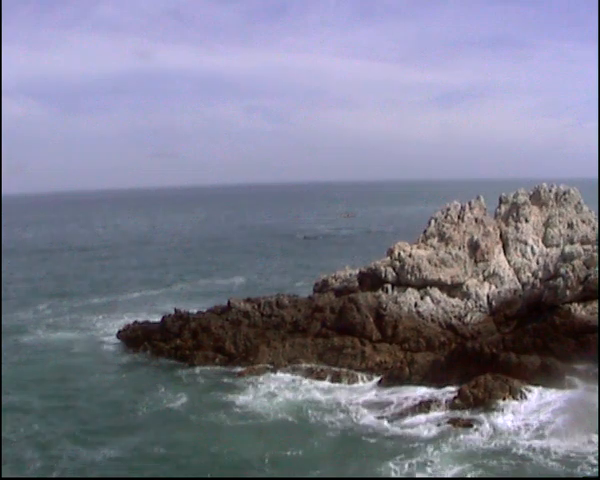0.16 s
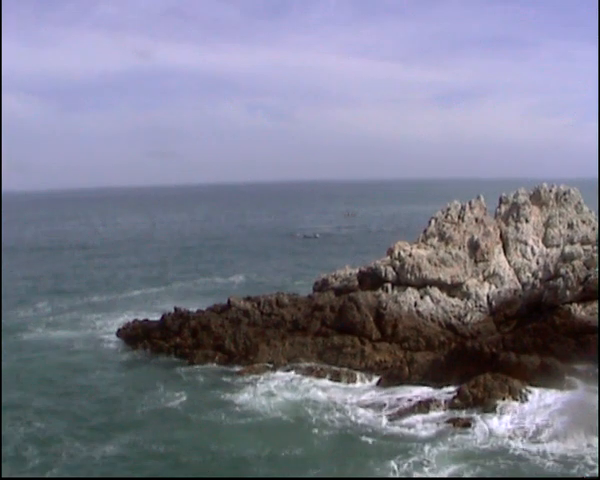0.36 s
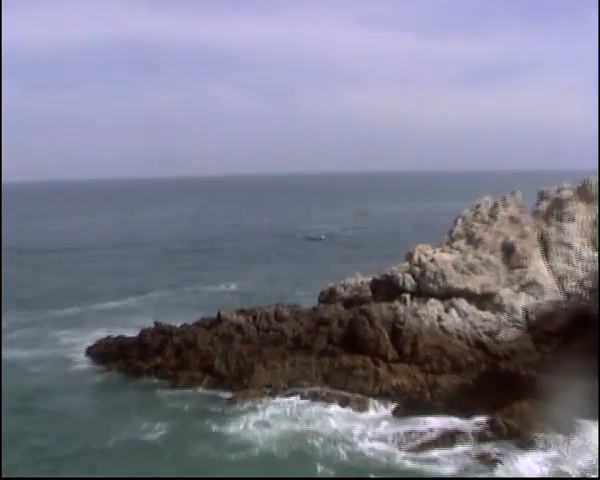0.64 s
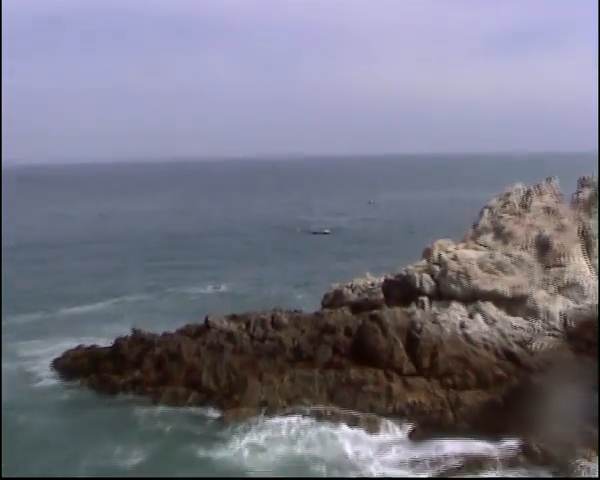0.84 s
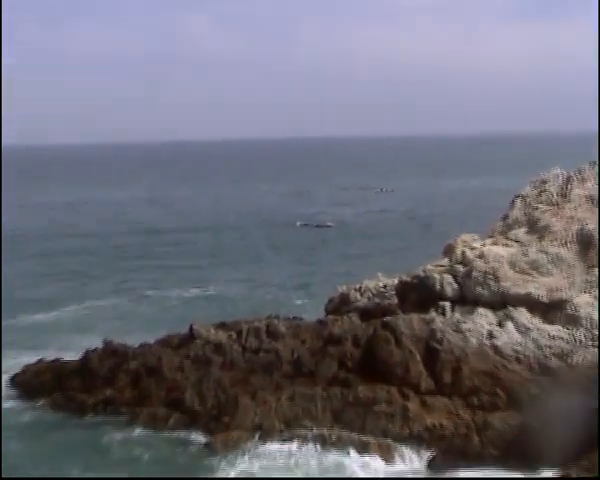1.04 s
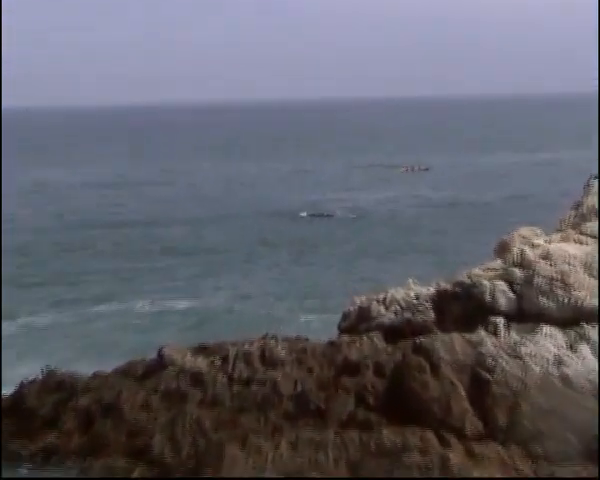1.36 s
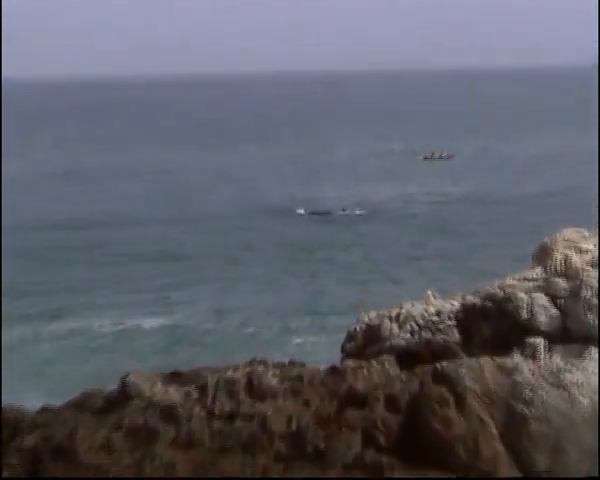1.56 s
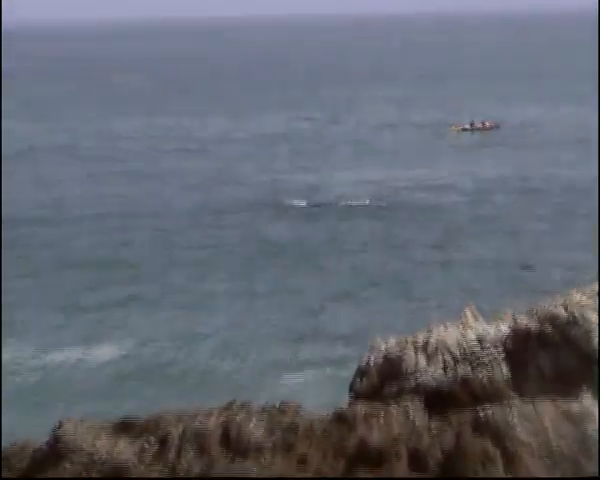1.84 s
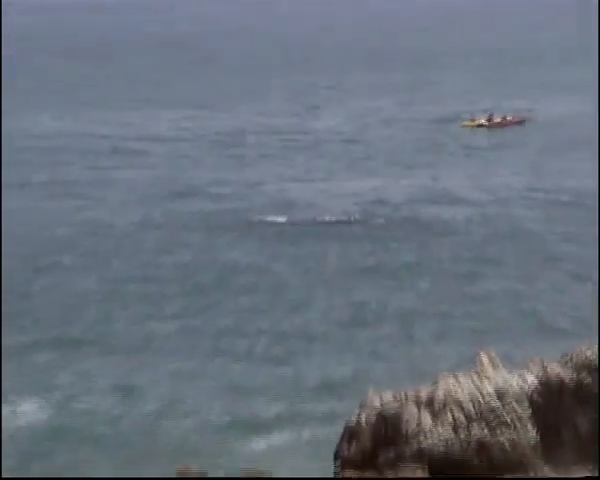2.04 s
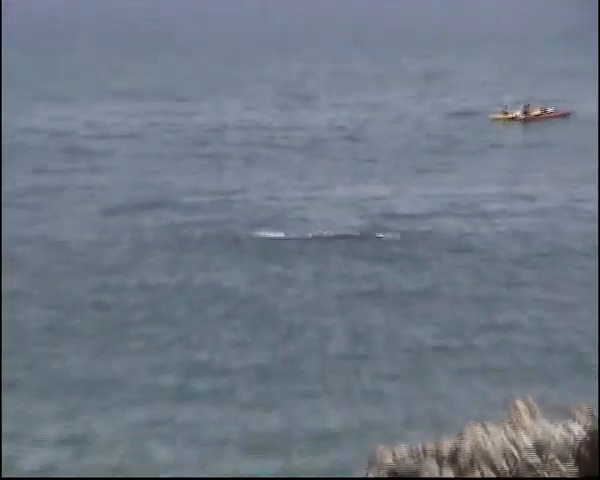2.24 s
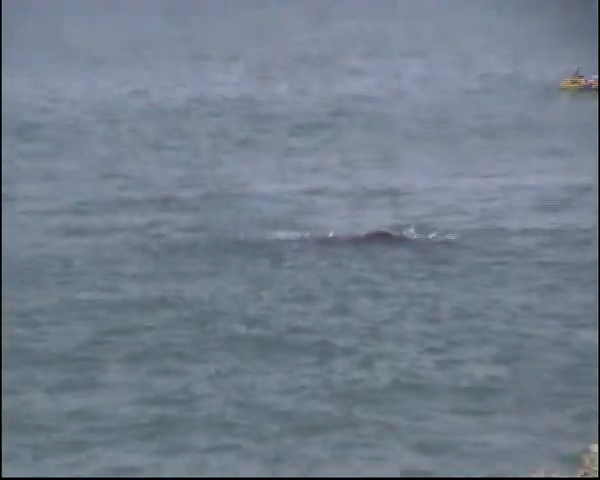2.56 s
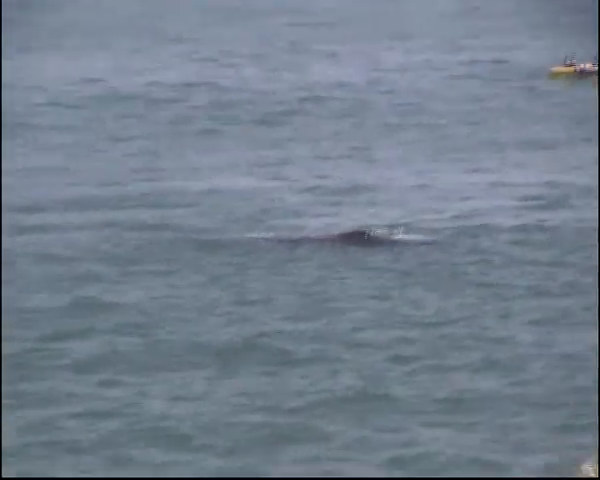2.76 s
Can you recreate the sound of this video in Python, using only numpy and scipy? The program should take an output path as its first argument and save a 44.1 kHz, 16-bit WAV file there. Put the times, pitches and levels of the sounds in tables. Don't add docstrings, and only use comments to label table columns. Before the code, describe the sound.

Surf washing steadily round coastal rocks, with low breaker rumble, bubbling foam and buffeting wind

```python
import sys
import numpy as np
from scipy import signal
from scipy.fft import rfft, irfft
from scipy.io import wavfile

SR = 44100
rng = np.random.default_rng(int(sys.argv[2]) if len(sys.argv) > 2 else 0)


def undo_db(level):
    steps = np.asarray(level, float) / 20
    return 10 ** steps


def transcribe(signal):
    frames = np.atleast_2d(signal).T
    limited = np.clip(frames, -1, 1)
    pcm = np.round(limited * 32767).astype(np.int16)
    wavfile.write(sys.argv[1], SR, pcm)


N = 127890


def rms_one(x):
    return x / np.sqrt(np.mean(x ** 2) + 1e-20)


def in_time(rows):
    return np.interp(np.arange(N) / SR, *np.transpose(rows))


def at_hz(points, hz):
    points_hz, values = np.transpose(points)
    return np.interp(np.log(hz), np.log(points_hz), values)


def drift(rate_hz):
    step, settle = 40, 2000
    pole = np.exp(-2 * np.pi * rate_hz * step / SR)
    noise = rng.standard_normal(N // step + settle + 2)
    slow = signal.lfilter([1], [1, -2 * pole, pole ** 2], noise)[settle:]
    return np.interp(np.arange(N) / step, np.arange(len(slow)), rms_one(slow))


def colour(x, peaks):
    for hz, width_hz, db in peaks:
        a = undo_db(db / 2)
        w = 2 * np.pi * hz / SR
        k = np.pi * width_hz / SR
        top = [1 + k * a, -2 * np.cos(w), 1 - k * a]
        bottom = [1 + k / a, -2 * np.cos(w), 1 - k / a]
        x = signal.lfilter(top, bottom, x)
    return x


# time in seconds, level in dB.
WASH_VIGOUR = [(0.06, -22.5), (0.08, -23.5), (0.38, -20.5), (0.4, -19.5), (0.42, -21.5), (1.76, -21.5),
               (2.88, -24), (2.9, -22.5)]
# time in seconds, level in dB.
BREAKER_THUD = [(0.06, -27), (0.07, -30.5), (0.4, -25), (0.48, -31.5), (0.57, -25.5), (0.62, -27.5),
                (1.17, -25.5), (1.19, -23), (1.59, -26.5), (1.7, -22.5), (1.85, -30), (1.88, -24.5),
                (2.88, -27.5), (2.9, -33)]
# frequency in Hz, level in dB per Hz.
FOAM_COLOUR = [(60, -4.5), (130, -3.5), (230, -5.5), (470, -11.5), (1500, -11.5), (3500, -20), (7000, -27),
               (11000, -35)]
# frequency in Hz, share from 0 to 1.
FOAM_LIKENESS = [(60, 0.87), (300, 0.98), (1100, 1), (1900, 1), (2600, 0.75), (4000, 0.6), (6000, 0.72),
                 (10000, .4)]


def foam(vigour_db, thud_db):
    foam_db, patch_db = 1.5, 0.45
    rumble_hz, rumble_follows = 298, 0.69
    wash_swing = vigour_db - vigour_db.mean()
    thud_swing = rumble_follows * (thud_db - thud_db.mean())
    edges = 45 * 2 ** (np.arange(26) / 3)
    white = rng.standard_normal((2, 2, N))
    together, neighbour = drift(8.5), drift(9.0)
    out = 0
    for k, (low, high) in enumerate(zip(edges, edges[1:])):
        band = signal.butter(2, [low, high], "band", fs=SR, output="sos")
        mid, side = signal.sosfilt(band, white[k % 2])
        hz = np.sqrt(low * high)
        own = drift(27.0)
        patches = 0.52 * together + 0.6 * neighbour + 0.6 * own
        deep = 1 / (1 + (hz / rumble_hz) ** 2)
        swing = (1 - deep) * wash_swing + deep * thud_swing
        gain = undo_db(at_hz(FOAM_COLOUR, hz) + swing + patch_db * patches)
        alike = np.clip(at_hz(FOAM_LIKENESS, hz), 0, 1)
        pair = np.sqrt(1 + alike) * mid + np.sqrt(1 - alike) * side * [[1], [-1]]
        out = out + gain * pair
        neighbour = own
    return undo_db(vigour_db.mean() + foam_db) * rms_one(out)


# resonance in Hz, width in Hz, level in dB.
COVE_HOLLOWS = [
    (61, 11, 5),
    (119, 26, 3.5),
    (202, 27, 3.5),
    (234, 34, -1.5),
]


def cove(surf):
    return colour(surf, COVE_HOLLOWS)


def bubbles(vigour_db):
    per_second, level_db = 1500, -7
    ring_cycles = 7.2
    strength = undo_db(2.27 * np.minimum(rng.exponential(1, N), 4)) * rng.choice([-1, 1], N)
    born = rng.random(N) < per_second * undo_db(3.0 * drift(7.0)) / SR
    pitches = np.geomspace(500, 5000, 24)
    dealt = rng.integers(0, len(pitches), N)
    out = 0
    for k, hz in enumerate(pitches):
        r = undo_db(-60 * hz / (ring_cycles * SR))
        w = 2 * np.pi * hz / SR
        bursts = strength * born * (dealt == k) + 1e-18
        out = out + signal.lfilter([0, np.sin(w)], [1, -2 * r * np.cos(w), r * r], bursts)
    return undo_db(vigour_db + level_db) * rms_one(out)


# time in seconds, level in dB.
PORT_GUSTS = [(0.06, -27), (0.39, -27), (0.45, -41), (0.49, -24.5), (0.63, -46), (0.65, -29), (0.87, -27),
              (0.94, -40), (1.74, -18.5), (1.93, -35), (2.08, -17.5), (2.23, -33), (2.27, -23), (2.49, -39),
              (2.61, -22.5), (2.65, -52), (2.86, -19), (2.9, -42)]


def wind():
    low_hz, high_hz = 6.7, 37
    own_share, lump_db, follows = 0.026, 0.9, 0.92
    side_db = np.array([[4], [-9]])
    band = signal.butter(2, [low_hz, high_hz], "band", fs=SR, output="sos")
    noise = rng.standard_normal((3, N + SR))
    shared, left, right = rms_one(signal.sosfilt(band, noise)[:, SR:])
    pair = np.sqrt(1 - own_share) * shared + np.sqrt(own_share) * np.array([left, right])
    gust_db = in_time(PORT_GUSTS)
    gust_db = gust_db.mean() + follows * (gust_db - gust_db.mean())
    return pair * undo_db(gust_db + lump_db * drift(10.0)) * undo_db(side_db)


def whine():
    hz, level_db = 7200, -56
    tone = np.sin(2 * np.pi * hz * np.arange(N) / SR)
    return undo_db(level_db) * tone * [[0.2], [1]]


# start in seconds, level in dB, pitch in Hz, time to peak in seconds.
ROCK_SPLASHES = [
    (0.336, -26, 3100, 0.0018),
    (.36, -29.5, 900, 0.031),
    (.385, -28.5, 2000, .012),
    (0.689, -26.5, 1490, 0.028),
    (0.763, -21, 2300, .002),
    (1.093, -35, 3000, 0.0088),
    (2.286, -27.5, 500, .03),
    (2.746, -28.5, 2700, 0.0043),
]


def splashes():
    half_width_octaves = 0.26
    t = np.arange(N) / SR
    spray = rng.standard_normal(N)
    out = np.zeros(N)
    for start, db, hz, length in ROCK_SPLASHES:
        edges = hz * 2.0 ** np.array([-half_width_octaves, half_width_octaves])
        band = signal.butter(1, edges, "band", fs=SR)
        u = np.maximum(t - start, 0) / length
        swell = np.e * u * np.exp(-u)
        out += undo_db(db) * swell * rms_one(signal.lfilter(*band, spray))
    return out


# frequency in Hz, width in Hz, level in dB.
HOUSING = [(500, 77, -1.5), (1060, 170, -2.5), (1440, 170, 0), (2000, 160, -2), (6300, 450, -3)]
# frequency in Hz, width in Hz, level in dB.
LEFT_COLOUR = [(120, 82, 0.44), (1000, 310, -0.27), (2780, 370, -0.5), (3570, 550, -4), (4760, 1500, 4.5),
               (5950, 1170, -7.5), (9600, 5800, 3)]
# frequency in Hz, width in Hz, level in dB.
RIGHT_COLOUR = [(2700, 580, 1.5), (3100, 490, 4), (4450, 950, -5), (5000, 510, -3.5), (7500, 4700, 3),
                (8700, 400, -7)]


def ports(sea):
    left_db, right_db, left_lag_s = 1.35, -0.6, 2.5e-5
    left, right = colour(sea, HOUSING)
    hz = np.arange(N // 2 + 1) * SR / N
    left = irfft(rfft(left) * np.exp(-2j * np.pi * hz * left_lag_s), N)
    left = undo_db(left_db) * colour(left, LEFT_COLOUR)
    right = undo_db(right_db) * colour(right, RIGHT_COLOUR)
    return np.array([left, right])


def scene():
    vigour_db = in_time(WASH_VIGOUR)
    surf = cove(foam(vigour_db, in_time(BREAKER_THUD)))
    sea = surf + bubbles(vigour_db) + splashes()
    return ports(sea) + wind() + whine()


def roll_off(x):
    return signal.sosfilt(signal.butter(12, 11715, fs=SR, output="sos"), x)


def record(dry):
    start_s, fade_s = 0.0355, 0.0013
    opened = np.clip((np.arange(N) / SR - start_s) / fade_s, 0, 1)
    gentle = signal.butter(4, 10520, fs=SR, output="sos")
    steep = signal.butter(10, 10700, fs=SR, output="sos")
    mix = signal.sosfilt(np.vstack([gentle, steep]), dry) * opened
    return roll_off(mix)


dry = scene()
out = record(dry)
transcribe(out)
```